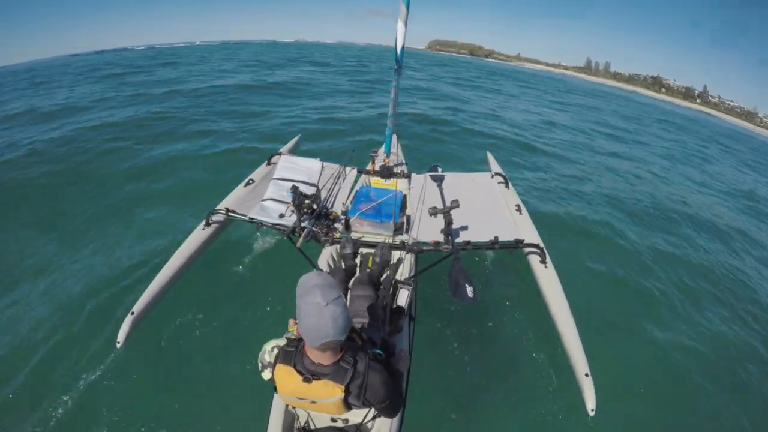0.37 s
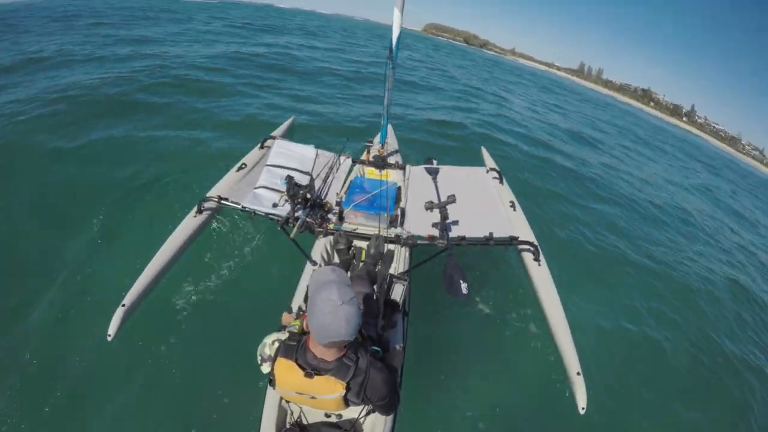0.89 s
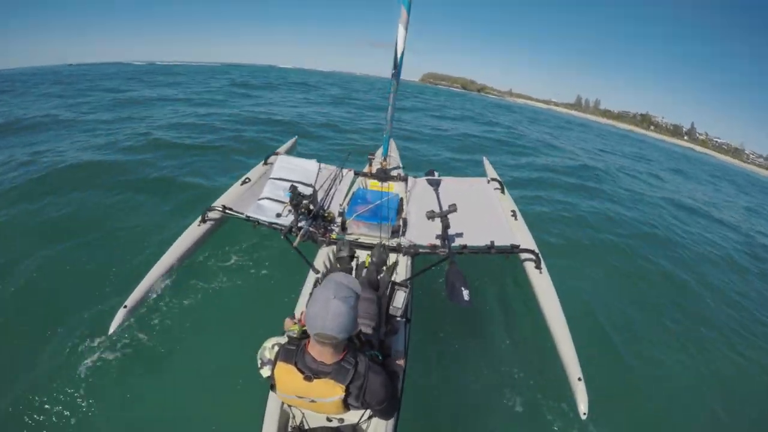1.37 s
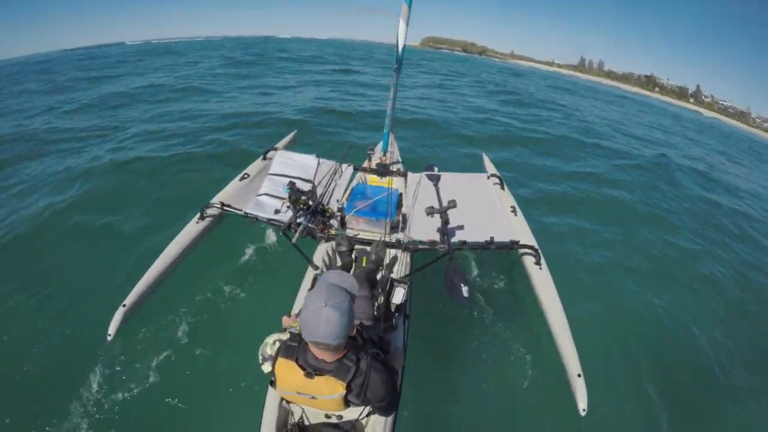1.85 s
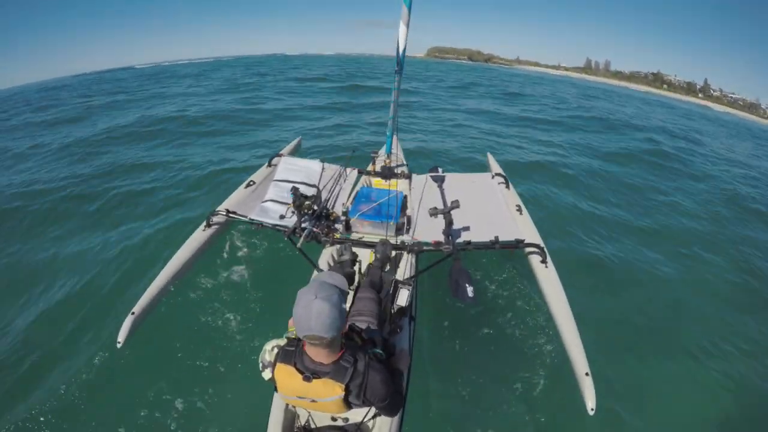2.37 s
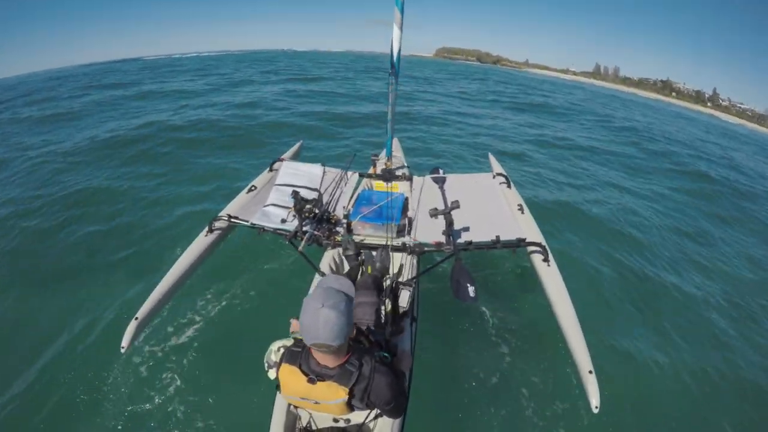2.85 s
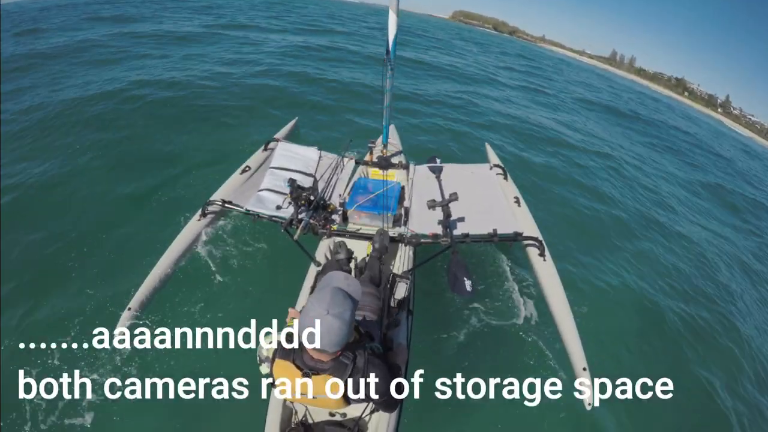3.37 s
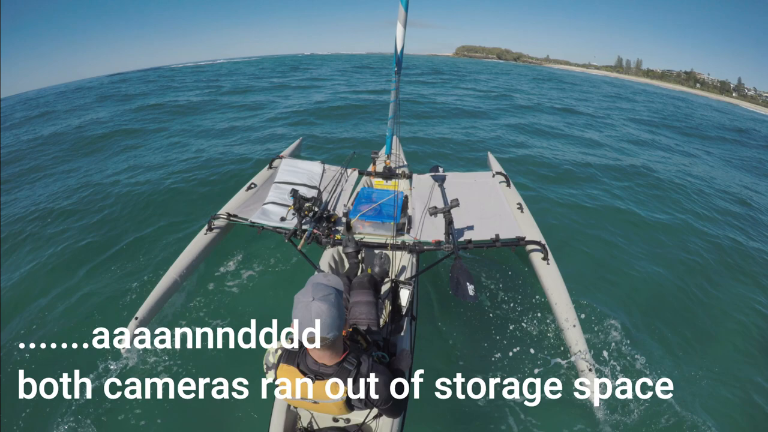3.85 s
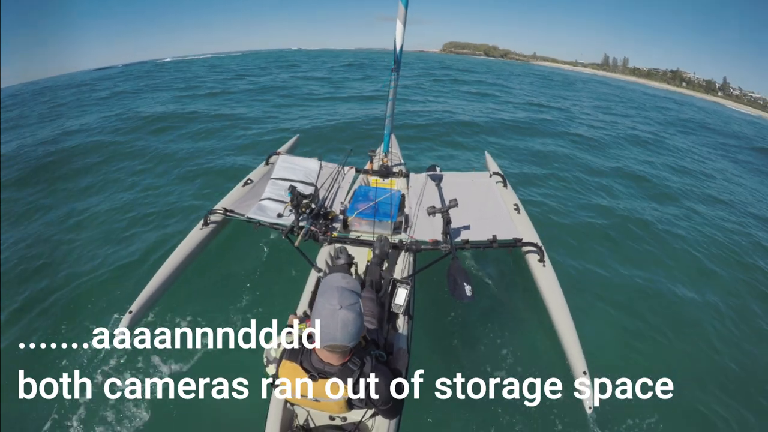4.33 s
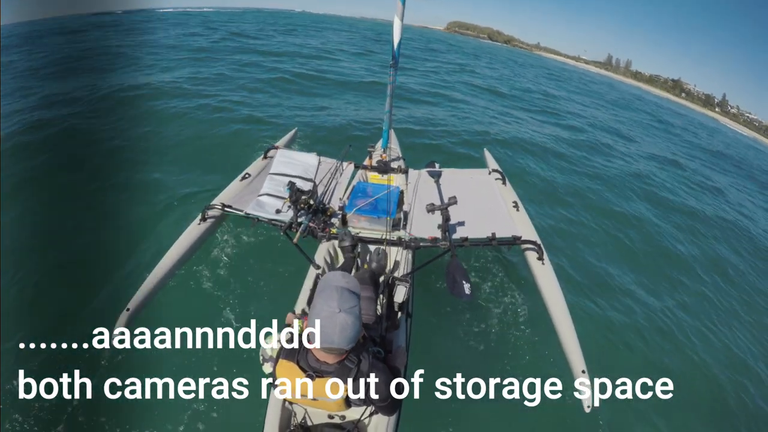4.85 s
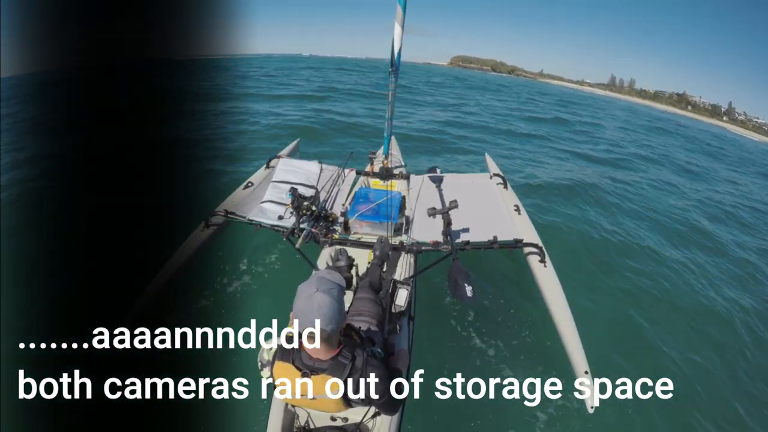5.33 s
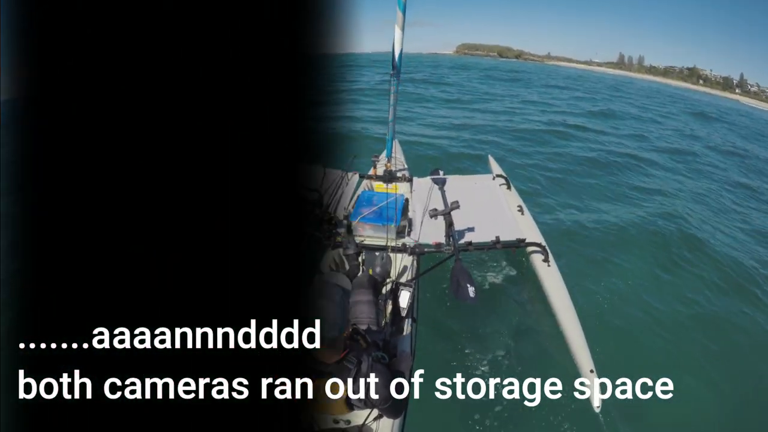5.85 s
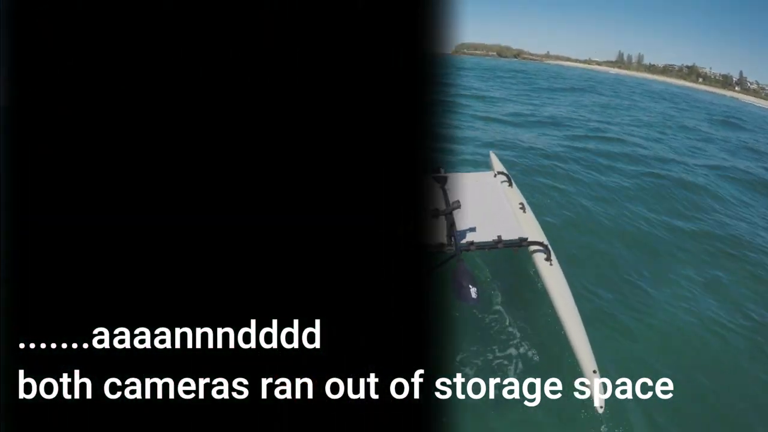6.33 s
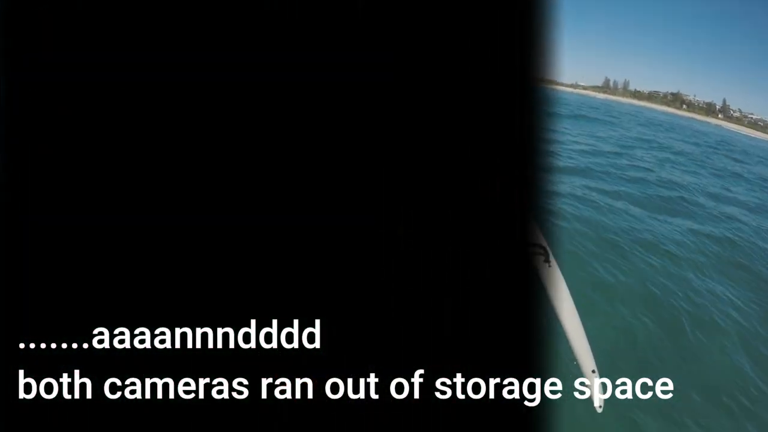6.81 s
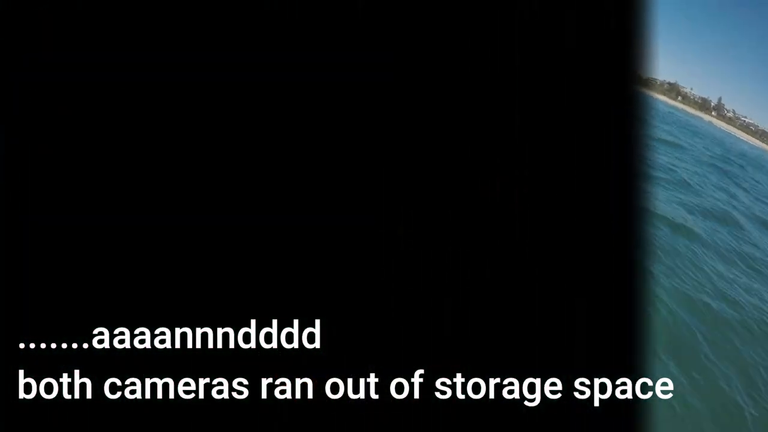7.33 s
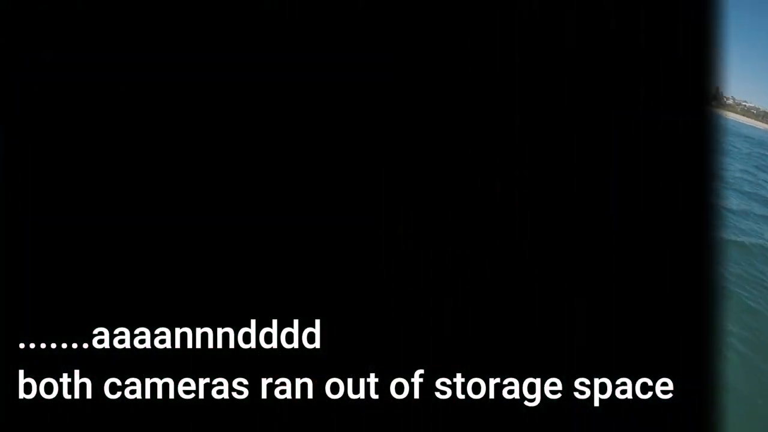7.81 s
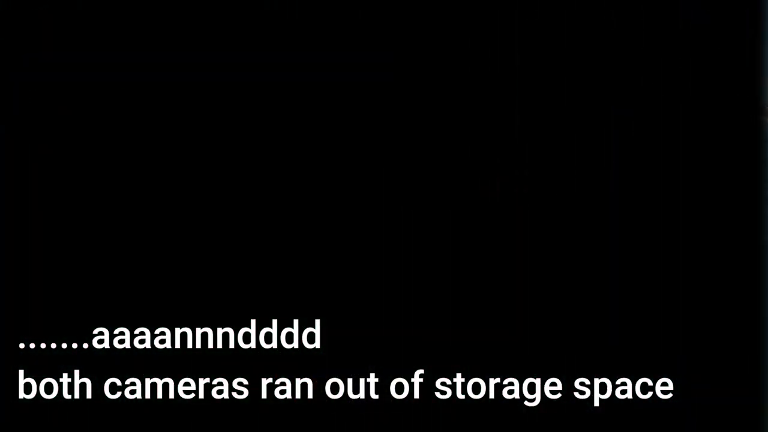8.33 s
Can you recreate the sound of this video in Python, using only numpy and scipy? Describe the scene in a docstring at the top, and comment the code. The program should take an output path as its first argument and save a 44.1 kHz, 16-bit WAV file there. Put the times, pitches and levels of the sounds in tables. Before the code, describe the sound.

Hollow plastic knocks and clicks chatter in quick irregular runs over low watery rumble and wind buffeting, pausing briefly near the middle, then fading away.

```python
"""A small camera on a pole rides a light sailing boat in a chop. From the start each wave flexes hull and mount,
and the joint slips: ringing tones knock and chatter in quick runs, with a lull in the slaps near 4 s.
Under this, filtered noise makes water rumble, wind buffet two microphone ports and spray hiss far behind; the pole
hums after jolts, and a few air pockets pop from 0.7 s on as short rising tones.
From 5 s the whole scene fades away, almost to nothing at the end."""
import sys
import numpy as np
from scipy import signal
from scipy.fft import rfft, irfft, next_fast_len
from scipy.io import wavfile
from scipy.ndimage import uniform_filter1d, minimum_filter1d, map_coordinates

SR = 44100
rng = np.random.default_rng(int(sys.argv[2]) if len(sys.argv) > 2 else 0)


def invert_db(x):
    """Field ratio 10**(x/20) for x, a level in decibels (scalar or array-like)."""
    u = np.asarray(x, float) / 20
    return 10 ** u


def store_pcm(level_fs):
    """Save levels as 16-bit WAV."""
    pcm = np.round(np.clip(level_fs, -1, 1) * 32767).astype(np.int16)
    wavfile.write(sys.argv[1], SR, np.atleast_2d(pcm).T)


N = 372191  # length [samples]

# Levels in the tables are starting points: the functions add chance and balance to them.
# slaps, from one slip to a run; a length near or below zero gives one slip:
# (time [s], run length [ms], click [dB], thud over click [dB], snap over click [dB])
SLAPS = [(.004, 26.5, -13.5, 3, -22.5), (.06, -2.5, -29.5, 16, -36), (0.089, -3, -31.5, 16, -5),
         (.114, -2, -32, 21, -28), (.215, 0, -42.5, 9, -25), (.473, -8, -40.5, 17.5, -16.5),
         (0.51, 0.5, -12.5, -0.5, -27.5), (0.535, -1, -34, 19.5, -3.5), (0.548, -2, -32.5, 8, -32.5),
         (0.555, -2, -2.5, -9.5, -21.5), (.597, -1, -55.5, -7.5, 2.5), (0.712, 12.5, -37.5, 11, -37),
         (0.722, 1, -4.5, -6, -24), (.727, 20, -19, 0, -40.5), (.818, 6, -27.5, 9, -29.5),
         (.848, 0, -38, 15, -34), (1.012, 12.5, -25.5, 12, -35), (1.075, 0, -21, 9, -34),
         (1.082, 15, -14, 2.5, -30.5), (1.108, 6, -13.5, 2, -31), (1.125, 9, -20.5, -10, -27.5),
         (1.174, 0, -14, -0.5, -37), (1.333, 1, -13, -9.5, -29), (1.34, 27.5, -16, 1.5, -23.5),
         (1.57, 30, -13, -1, -31), (1.612, 5, -39, 9.5, -36.5), (1.656, 0, -52, 5.5, -2.5),
         (1.684, 2, -43, 0, -34.5), (1.834, 24.5, -13.5, -2, -31), (1.866, 26, -18, 2, -32),
         (1.9, 1, -22, -12.5, -29.5), (1.931, 5.5, -13.5, -0.5, -37), (1.954, 7, -19, 1, -37),
         (1.977, 1, -17.5, 3, -37), (1.999, 0, -17, -4.5, -29.5), (2.013, 0, -17.5, 5.5, -32.5),
         (2.032, 40, -17.5, -1.5, -29), (2.146, 3, -30, -16, -24), (2.169, 0, -42, -4, -18),
         (2.178, 0, -23.5, 2, -28), (2.185, 5, -17, -6.5, -38), (2.211, 13.5, -29.5, -9, -29),
         (2.252, 2, -43, 21.5, -30), (2.286, 1, -13, -3, -31.5), (2.346, 15.5, -19, 3.5, -36),
         (2.403, 2, -12, -3, -39), (2.41, 9, -22, 5, -28), (2.428, 20.5, -16, 0, -32.5),
         (2.486, 19.5, -48.5, 5, -32), (2.51, -2, -11, -0.5, -29.5), (2.666, 30, -11.5, 0.5, -36.5),
         (2.707, 5.5, -18, 1.5, -28), (2.765, 5, -47.5, 4, -8), (2.979, 28, -14, -0.5, -32),
         (3.015, 15, -18.5, 4.5, -34.5), (3.065, 2, -43, 4, -34), (3.25, 0, -51, 2, -26),
         (3.293, 0, -45.5, -4, -23), (3.407, 6, -22, -1.5, -26), (3.429, 0.5, -40, -4, -27),
         (3.447, -10, -15.5, 0, -34.5), (3.517, -5, -10, -0.5, -27), (3.653, 0, -11.5, 0.5, -25),
         (3.66, 28.5, -15, 2.5, -36.5), (3.695, 0, -15, 5, -21.5), (3.726, -0.5, -14, -0.5, -38),
         (3.781, -7, -41, 24, -34), (3.9, 2, -52, -8, -5), (4.632, -1, -38, 20, -32),
         (4.775, -0.5, -38.5, 17, -12), (4.802, 3, -33.5, -10.5, -20.5), (4.868, 31, -16.5, 0.5, -28),
         (4.91, 29.5, -37, 16.5, -36), (4.985, -2, -16.5, 1, -29.5), (5.146, 3, -14.5, 3, -24),
         (5.15, 16, -27, 1, -26), (5.173, 20.5, -19, 3, -30), (5.246, 5, -16.5, 2, -35),
         (5.442, -2, -44, 4.5, -19), (5.496, 0, -45.5, -6, -22), (5.514, 0, -36, 2, -12),
         (5.574, 0, -31.5, -11, -26), (5.611, 0, -18, -13, -27), (5.625, 30, -18.5, 2, -24.5),
         (5.663, 29, -16, 1, -29.5), (5.721, 33, -17.5, 1, -34.5), (5.817, 0, -55, -6, 3.5),
         (5.964, 0.5, -10, -5.5, -30.5), (5.973, 8, -22, 0, -29.5), (6.017, 1.5, -36, 7, -35),
         (6.047, 23.5, -28, 3.5, -30), (6.125, 2, -36.5, 9, -29), (6.174, 0, -36.5, 4.5, -40),
         (6.185, 3, -26, 0, -17), (6.207, 7, -27, -5, -17), (6.251, -3, -38.5, 25.5, -34.5),
         (6.313, -3, -31, -12, -26), (6.336, 14.5, -21, -0.5, -39), (6.368, -2, -41, 4, -1),
         (6.379, 0, -19, -8, -38), (6.42, 17.5, -18.5, 0, -27.5), (6.502, 3.5, -36, -1, -21),
         (6.527, 0, -27.5, 15.5, -35), (6.555, 19, -24, 6.5, -36.5), (6.577, 22, -19.5, -3.5, -30),
         (6.607, 13, -20, 1, -24.5), (6.668, 7, -18, -3, -31), (6.837, 3, -14.5, -1.5, -30.5),
         (6.866, 2, -28, 11.5, -23), (6.906, 0, -41.5, 16.5, -40), (7.084, 12.5, -16.5, -5, -30),
         (7.106, 3, -32, 12, -34), (7.134, 0, -38, 13, -36), (7.155, 28, -28, 9.5, -29),
         (7.19, 21.5, -21.5, 3, -27), (7.329, -3, -21.5, -12, -19), (7.341, 6.5, -23, 0.5, -19),
         (7.449, 1, -33.5, 17, -29), (7.464, -3, -19.5, 7, -40), (7.483, 22, -23.5, 0, -31),
         (7.534, 19.5, -20.5, 1, -33), (7.647, 0, -37, 18, -34), (7.668, 6, -21.5, 3, -39),
         (7.681, 40.5, -21, 0, -21.5), (7.784, 0, -18.5, -6, -26.5), (7.977, 36, -20, 1.5, -29),
         (8.1, 0, -38.5, 14.5, -28), (8.227, 20.5, -19.5, -1, -27.5), (8.264, 23, -24, 5, -34)]
# ringing tones of housing, hull and joint:
# (pitch [Hz], level [dB], time to fall 60 dB [s], left over right [dB], left lead [rad])
CLICK_MODES = [(1275, -9.5, 0.014, 3.5, 2.73), (1574, -1, 0.015, 2, 3.2), (1748, -2.5, 0.017, 1.3, 3.84),
               (1942, -5.5, 0.014, 1.3, 4.35), (2220, -11, 0.01, -2, 4.82), (2434, -23, .011, 3, 4.8)]
KNOCK_MODES = [(606.5, -7.5, 0.038, 1.2, 1.69), (729, -6, 0.035, 8.1, 1.53), (840, -7, 0.035, 6.1, 2.14),
               (1102, -3.5, 0.038, 4.4, 2.85)]
THUD_MODES = [(147.7, -11.5, 0.23, 7, -1.72), (183.95, -5, 0.13, -2.4, -0.46),
              (231.9, -9.5, 0.097, -5.5, -0.76), (293.4, -7.5, 0.086, 1.5, -0.99),
              (428.7, -18, 0.038, -5.5, 0.81)]
SNAP_MODES = [(2620, 4.5, 0.0096, -4.5, 7.8), (3350, -2, 0.017, 0, 5.63), (3670, -2.5, 0.015, -1.5, 8.6),
              (4210, -7, 0.016, 0.6, 10), (5600, -14.5, 0.016, -0.3, 7.6)]
# colour of the bright crack noise: (frequency [Hz], level [dB per Hz])
CRACK_COLOUR = [(3000, -36.5), (4500, -4), (6000, 0.5), (8000, -3), (10000, -7.5), (12500, -26),
                (15000, -32)]
# drops of spray that tick on the housing: (time [s], level [dB])
DROPS = [(0.0247, -49.5), (1.44, -62.5), (3.136, -58), (3.16, -62.5), (3.29, -61), (3.6392, -54.5),
         (4.059, -59), (4.137, -50.5), (4.7072, -57), (4.7208, -43.5), (4.806, -51), (4.8264, -48.5),
         (4.8815, -38.5), (5.5086, -52.5), (5.642, -48.5), (5.7367, -49), (7.687, -46)]
# strength of the wind gusts: (time [s], level [dB])
GUSTS = [(0, -28.5), (.25, -32), (.54, -29), (.65, -34.5), (.82, -26.5), (1.1, -38.5), (1.5, -37.5),
         (1.95, -38), (2.3, -36), (2.9, -39), (3.4, -41.5), (3.6, -36.5), (4, -33), (4.2, -40.5),
         (4.38, -33.5), (4.86, -32), (5.1, -31), (5.5, -33.5), (5.8, -39.5), (6.05, -30), (6.6, -37),
         (7.05, -35.5), (7.5, -37.5), (8.44, -37.5)]
# jolts that set the pole humming: (time [s], level [dB])
JOLTS = [(.02, -46), (.6, -20), (1.05, -27), (1.45, -32.5), (1.95, -40.5), (2.5, -26), (2.75, -33),
         (3, -34), (3.53, -28), (3.9, -36.5), (4.35, -33.5), (4.92, -30), (5.33, -29.5), (5.75, -33),
         (5.92, -28), (6.7, -37), (7.17, -32.5)]
# surge of water along the hull: (time [s], level [dB])
SURGE = [(0, -10.5), (.05, -23), (.22, -36), (.47, -34), (.63, -28), (.8, -33.5), (1.3, -38), (1.67, -28),
         (1.85, -34.5), (2.4, -30.5), (2.72, -49.5), (3.15, -36.5), (3.48, -44), (3.7, -35.5), (4.1, -42.5),
         (4.38, -26), (4.55, -37.5), (4.83, -23), (4.97, -36.5), (5.5, -41), (5.85, -36), (6.1, -29),
         (6.53, -29), (6.85, -40.5), (7.3, -30.5), (7.75, -41.5), (8.44, -36.5)]
# strength of the spray: (time [s], level [dB])
SPRAY = [(0, -86), (.22, -71), (.47, -73), (.55, -68.5), (.62, -88), (.71, -68), (.78, -84.5), (1, -72.5),
         (1.25, -89), (1.45, -78), (1.66, -91), (1.83, -74), (2.2, -76.5), (2.9, -84), (3.14, -81),
         (3.5, -72), (3.88, -67), (4.25, -77), (4.42, -72.5), (4.69, -71.5), (4.73, -66.5), (4.78, -59.5),
         (4.85, -49), (4.9, -69), (5, -81.5), (5.42, -75), (5.52, -70), (5.6, -79), (5.84, -90),
         (5.9, -64.5), (6.02, -83.5), (6.25, -72), (6.95, -86.5), (7.04, -64.5), (7.12, -81), (7.35, -67.5),
         (7.45, -75.5), (8.44, -83)]
# air pockets that pop: (time [s], base pitch [Hz], level [dB], life [s])
BUBBLES = [(.742, 784, -31, 0.038), (2.075, 820, -24.5, 0.047), (4.63, 610, -39, 0.035),
           (5.972, 840, -22, 0.039), (6.236, 718, -25.5, 0.041), (7.1, 806, -25, 0.035)]
# colours of wind, hull rumble, wash and spray: (frequency [Hz], level [dB per Hz])
BUFFET_COLOUR = [(12, -36.5), (22, 2.5), (45, -5.5), (62, -6), (100, -10.5), (140, -24.5), (300, -81)]
RUMBLE_COLOUR = [(70, -43), (110, -9), (141, 1.5), (175, 1), (212, 1.5), (300, -19), (350, -15.5),
                 (450, -34), (700, -67)]
WASH_COLOUR = [(250, -27.5), (450, 2.5), (620, -3), (820, -6.5), (1260, -16), (1410, -17.5), (1680, -14.5),
               (2100, -20), (2600, -31.5), (3500, -33.5), (5000, -69)]
HISS_COLOUR = [(1900, -25), (3100, 4), (5100, -4.5), (7600, -1), (9400, -7.5), (11000, -23), (13000, -38.5),
               (15500, -67.5)]
# how the two ports hear noise: (frequency [Hz], likeness [0-1], left over right [dB], left lead [rad])
PORTS = [(39.6, 0.17, -7, 1.37), (94, .35, -8, 0.35), (153, 1, 2, 0.46), (296, 1, 3, -1.4),
         (510, 0.1, 4, 1.5), (800, 0.6, 5.5, 1.5), (1803, 0.2, -8, 3.5), (3160, 0.46, -2, 3.5),
         (5200, 0.1, 5.5, 6.5), (7600, 0, -2.5, 7.5), (10500, 0, -4.5, 13.5)]

SLIP_GAP_MS, RUN_SWELL_DB = 7, -3  # rough time between slips; change of level over a run
CREAKS_PER_S, CREAK_DB = 7.7, -57.5  # faint random ticks of the joint; click level of the weakest
KNOCK_DB, KNOCK_GROWS, FIRM_DB = -4.5, 0.77, -17.5  # knock over click at a firm slip; growth per dB of click
KNOCK_WITH_THUD = .2  # dB of knock for each dB of thud
CRACK_DB, CRACK_GROWS, FIRM_SNAP_DB = -58.5, 1.27, -43  # crack at a firm snap; growth per dB of snap
SHARPEST_DB = -21.5  # snap over click beyond this adds no crack
POLE_HZ, POLE_WIDTH_HZ = 76, 8.3
HUM_RISE_S, HUM_T60_S = .03, 1.45
WASH_DB, WASH_GROWS, CALM_DB = -62, 0.64, -35  # wash at a calm surge; its growth per dB of surge
SPRAY_WASH_DB = 6.5  # wash that spray brings, over the spray
DIP_DB, WASH_DIP_DB = 8, 1.5  # deepest dip of spray hiss and of wash after slips
DIP_DELAY_S, DIP_T60_S, DIP_FLOOR_DB = 0.0064, 0.32, -31.5  # slips well below the floor hardly dip them
SLOSH_DB, SLOSH_HISS_DB, SLOSH_T60_S = -22, -58.5, 0.048  # wet noise at each slip
FADE_START_S, FADE_END_S = 5, 8.483


def mount(s, db, thud_db, snap_db):
    """The joint clicks and knocks in the housing, thuds in the hull and snaps in the treble, with grit around."""
    luck = rng.random((len(s), 2, 3))
    # weaker grit creeps before each slip and trails after it
    grit_s = s[:, None] + [-.009, .005, .011] * (.3 + luck[:, 0])
    grit_db = db[:, None] - [22, 14, 17] - 7 * luck[:, 1]
    knock_db = KNOCK_DB + (KNOCK_GROWS - 1) * (db - FIRM_DB) + KNOCK_WITH_THUD * thud_db
    all_s = np.column_stack([s, grit_s]).ravel("F")
    all_db = np.column_stack([db, grit_db]).ravel("F")
    all_knock_db = all_db + np.tile(knock_db, 4)
    all_snap_db = all_db + np.tile(snap_db, 4) - 1.0
    click = ring(CLICK_MODES, all_s, all_db + 0.5, contact_s=0.0015, scatter_db=1.0, twist=0.34, detune=0.032)
    knock = ring(KNOCK_MODES, all_s, all_knock_db, contact_s=0.0024, scatter_db=0.5, twist=1.37, detune=0.044)
    thud = ring(THUD_MODES, s, db + thud_db, contact_s=0.006, scatter_db=5.0, twist=0.54, detune=0.049)
    snap = ring(SNAP_MODES, all_s, all_snap_db, contact_s=.0006, scatter_db=5.5, twist=1.6, detune=0.057)
    return click + knock + thud + snap + cracks(s, db, snap_db)


def slips():
    """Stick-slip: lists (time, click dB, thud dB, snap dB) of each slip in the slaps and each faint creak."""
    rows = []
    for s, length_ms, db, *colour_db in SLAPS:
        share = np.linspace(0, 1, round(max(length_ms, 0) / SLIP_GAP_MS) + 1)
        inside = share * (1 - share) > 0  # only slips inside a run vary by chance
        luck = rng.standard_normal((16, 2))[:len(share)] * inside[:, None]
        when = s + (share * length_ms + .6 * luck[:, 0]) / 1000
        swell_db = RUN_SWELL_DB * (share - share.mean())
        click_db = db + swell_db + 1.6 * luck[:, 1]
        rows.append(np.column_stack([when, click_db, np.tile(colour_db, (len(share), 1))]))
    luck = rng.random((int(CREAKS_PER_S * N / SR), 4))
    rows.append([0, CREAK_DB, -4, -32] + luck * [N / SR, 10, 14, 14])
    return np.concatenate(rows).T


def ring(modes, s, db, contact_s, scatter_db, twist, detune, count=6):
    """Each blow sets a body ringing: fading tones, softened by the length of the contact.
    The load on the joint changes, so the modes come in several slightly detuned sets."""
    hz, mode_db, t60, tilt_db, lead = np.transpose(modes)
    luck = rng.standard_normal((len(s), 4, len(modes)))
    # each blow shares its strength anew among the modes, at new phases
    share = invert_db(mode_db + scatter_db * luck[:, 0])
    share *= np.linalg.norm(invert_db(mode_db)) / np.linalg.norm(share, axis=1)[:, None]
    size = invert_db(db)[:, None] * share * np.exp(1j * twist * luck[:, 1])
    half_tilt = invert_db(tilt_db / 2 + 1.0 * luck[:, 2])
    half = half_tilt * np.exp(.5j * (lead + 0.45 * luck[:, 3]))
    push = np.hanning(int(contact_s * SR) + 3)
    t = np.arange(int(t60.max() * SR)) / SR
    fall = invert_db(-60 * t / t60[:, None])
    decay = signal.fftconvolve(fall, push[None] / push.sum(), axes=1)[:, :len(t)]
    start = np.round(np.abs(s) * SR).astype(int)  # times before zero fold back
    at = start[:, None] + np.arange(len(t))
    out = np.zeros((2, N))
    for k, shift in enumerate(rng.standard_normal((count, len(modes)))):
        set_hz = hz * np.exp(detune * shift)
        tones = decay * np.exp(2j * np.pi * set_hz[:, None] * t)
        places = at[k::count].ravel()
        for port, weight in enumerate((size * half, size / half)):
            blows = (weight[k::count] @ tones).imag
            out[port] += np.bincount(places, blows.ravel(), N + SR)[:N]
    return out


def cracks(s, db, snap_db):
    """Brief bright noise at each slip, uneven in strength, and where a drop lands; louder at the right port."""
    drop_s, drop_db = np.transpose(DROPS)
    firmness_db = db + np.minimum(snap_db, SHARPEST_DB) - FIRM_SNAP_DB
    crack_db = CRACK_DB + CRACK_GROWS * firmness_db + 3 * rng.standard_normal(len(s))
    shape = swells(np.append(s, drop_s), np.append(crack_db, drop_db), 0.00054, 0.0078)
    pair = rush(colour(CRACK_COLOUR), patchy_db=3.6)
    return shape * (0.35 * pair + pair.mean(0) * invert_db([[-3.5], [3.5]]))


def wind():
    """Gusts make low noise, mostly separate at each port; jolts set the pole humming as noise and a wavering tone."""
    gust_db, = columns(GUSTS, np.arange(N) / SR)
    gust = invert_db(gust_db + 2.5 * wobble(7.9, channels=2) + 1.5 * wobble(9))
    buffet = gust * rush(colour(BUFFET_COLOUR), patchy_db=2.9)
    hum_noise = rush(lambda hz: 1 / (1 + ((hz - POLE_HZ) / POLE_WIDTH_HZ * 2) ** 2), patchy_db=0.5)
    phase = 2 * np.pi * POLE_HZ * np.arange(N) / SR + 1.2 * wobble(5)
    hum_tone = invert_db([[-3], [3]]) * np.sin(phase + [[.6], [-.6]])
    hum = .45 * hum_noise + hum_tone
    return buffet + swells(*np.transpose(JOLTS), HUM_RISE_S, HUM_T60_S) * hum


def water(s, db):
    """The hull rumbles in lumps with the surge; wash and spray noise flicker above it, and each slip sloshes."""
    t = np.arange(N) / SR
    surge_db, = columns(SURGE, t)
    spray_db, = columns(SPRAY, t)
    slosh = swells(s, db, 0.0023, SLOSH_T60_S)
    # wash and hiss dip after a slip and return
    after = swells(s + DIP_DELAY_S, db - DIP_FLOOR_DB, .005, DIP_T60_S)
    dip = after / (1 + after)
    washing = invert_db(WASH_DB + WASH_GROWS * (surge_db - CALM_DB)) + invert_db(spray_db + SPRAY_WASH_DB)
    washing = washing * invert_db(-WASH_DIP_DB * dip + 1.6 * wobble(4.4))
    hissing = invert_db(spray_db - DIP_DB * dip) + invert_db(SLOSH_HISS_DB) * slosh
    rumbling = invert_db(surge_db - 3.0 + 2.9 * wobble(25))
    rumble = rumbling * rush(colour(RUMBLE_COLOUR), patchy_db=2.46)
    wet = invert_db(-1.5) * washing + invert_db(SLOSH_DB + 1.8 * wobble(150)) * slosh
    wash_flicker = invert_db(1.0 * wobble(71) + 0.94 * wobble(8))
    wash = wet * wash_flicker * rush(colour(WASH_COLOUR), patchy_db=0.1)
    spray_flicker = invert_db(2.5 * wobble(90) + 1.7 * wobble(21))
    spray = hissing * spray_flicker * rush(colour(HISS_COLOUR), patchy_db=1.8)
    thumps = invert_db(surge_db - 6.5) * lapping(THUD_MODES, rate=40, spread_db=3.0, contact_s=.009)
    taps = lapping([*KNOCK_MODES, *CLICK_MODES], rate=98, spread_db=6.5, contact_s=0.0041)
    trickle = invert_db(-8.5) * washing * taps
    return rumble + wash + spray + thumps + trickle + bubbles()


def lapping(modes, rate, spread_db, contact_s):
    """Wavelets tap the hull at random moments, rate a second, and softly ring the given modes; mean of ports rms 1."""
    luck = rng.random((int(rate * N / SR), 2))
    tap_db = -spread_db * np.log(1 - .93 * luck[:, 1])  # many weak taps, few strong ones
    taps = ring(modes, luck[:, 0] * N / SR, tap_db, contact_s, scatter_db=4.5, twist=2.28, detune=0.093)
    return taps / np.sqrt(np.mean(taps.mean(0) ** 2))


def bubbles():
    """A soft tone with a weak overtone; it wavers and rises as the pocket nears the surface."""
    out = np.zeros(N)
    waver = 0.055 * wobble(160)[0]
    for s, hz, db, life in BUBBLES:
        start = int(s * SR)
        u = np.linspace(0, 1, int(life * SR))
        pitch = hz * (1 + 0.15 * u + waver[start:][:len(u)])
        phase = 2 * np.pi * np.cumsum(pitch) / SR
        tone = np.sin(phase) + invert_db(-17.5) * np.sin(1.6 * phase)
        out[start:][:len(u)] += invert_db(db) * np.sin(np.pi * u ** 0.32) * tone
    return out * [[1.3], [-.6]]  # the ports hear this range in opposite phase


def rush(gain, patchy_db):
    """Patchy noise as both ports hear it: partly shared, tilted and shifted in phase; mean of ports rms 1."""
    z = signal.stft(rng.standard_normal((2, N + 4096)), nperseg=512)[2]
    field = uniform_filter1d(rng.standard_normal(z.shape[1:]), 8, 0)
    field = uniform_filter1d(field, 4, 1)
    patchy = signal.istft(z * invert_db(patchy_db * unit(field)), nperseg=512)[1]
    a, b = rfft(patchy, next_fast_len(N + 4096))
    hz = np.linspace(0, SR / 2, len(a))
    alike, tilt_db, lead = columns(PORTS, hz, log=True)
    turn = np.arccos(np.clip(alike, 0, 1)) / 2  # mixing angle that gives this likeness
    half = invert_db(tilt_db / 2) * np.exp(.5j * lead)
    left = (np.cos(turn) * a + np.sin(turn) * b) * half
    right = (np.cos(turn) * a - np.sin(turn) * b) / half
    out = irfft([left, right] * gain(hz))[:, :N]
    return out / np.sqrt(np.mean(out.mean(0) ** 2))


def colour(spectrum):
    """Gain against frequency from (Hz, dB) points."""
    return lambda hz: invert_db(columns(spectrum, hz, log=True)[0])


def swells(s, db, rise_s, t60):
    """An envelope that rises at each moment and dies away."""
    t = np.arange(int(t60 * SR)) / SR
    peaks = np.bincount(np.round(np.abs(s) * SR).astype(int), invert_db(db), N)[:N]
    shape = (1 - np.exp(-t / rise_s)) * invert_db(-60 * t / t60)
    return np.abs(signal.fftconvolve(peaks, shape)[:N])


def wobble(rate, channels=1):
    """Smooth random curves, rate knots a second."""
    at = [np.arange(N) * rate / SR]
    knots = rng.standard_normal((channels, int(N * rate / SR) + 4))
    return np.array([map_coordinates(k, at) for k in knots])


def columns(rows, at, log=False):
    """Every column after the first, read at the given places."""
    key, *cols = np.transpose(rows)
    warp = (lambda v: np.log(v + 1)) if log else (lambda v: v)
    return [np.interp(warp(at), warp(key), c) for c in cols]


def unit(x):
    """Scaled to rms 1."""
    return x / np.sqrt(np.mean(x ** 2) + 1e-20)


def scene():
    """Adds up everything the ports pick up: mount, wind and water."""
    s, db, thud_db, snap_db = slips()
    return mount(s, db, thud_db, snap_db) + wind() + water(s, db)


def roll_off(x):
    """The treble ends steeply here."""
    return signal.sosfilt(signal.butter(12, 15000, fs=SR, output="sos"), x)


def record(dry):
    """A fast limiter holds the loudest knocks down; a soft start and a straight fade-out shape the whole."""
    need = np.minimum(1, invert_db(-8.0) / (np.abs(dry).max(0) + 1e-9))
    gain = minimum_filter1d(need, size=301)
    gain = uniform_filter1d(uniform_filter1d(gain, size=101), size=101)
    gain *= np.minimum(1, np.arange(N) / 60)  # soft start over 60 samples
    gain *= np.interp(np.arange(N) / SR, [FADE_START_S, FADE_END_S], [1, 0])
    return roll_off(dry * gain)


dry = scene()
out = record(dry)
store_pcm(out)
```